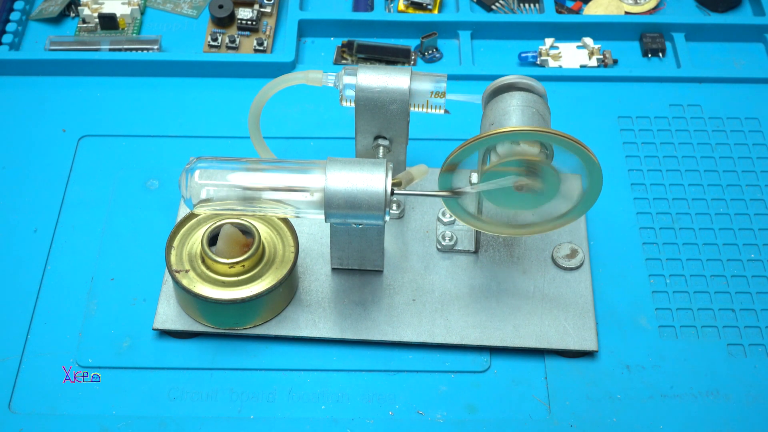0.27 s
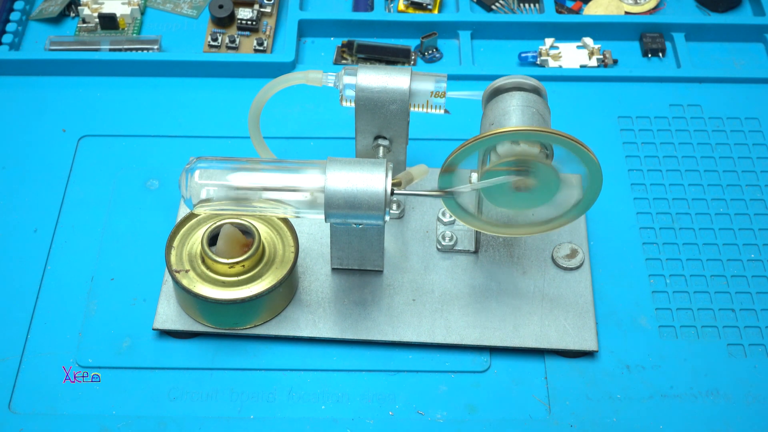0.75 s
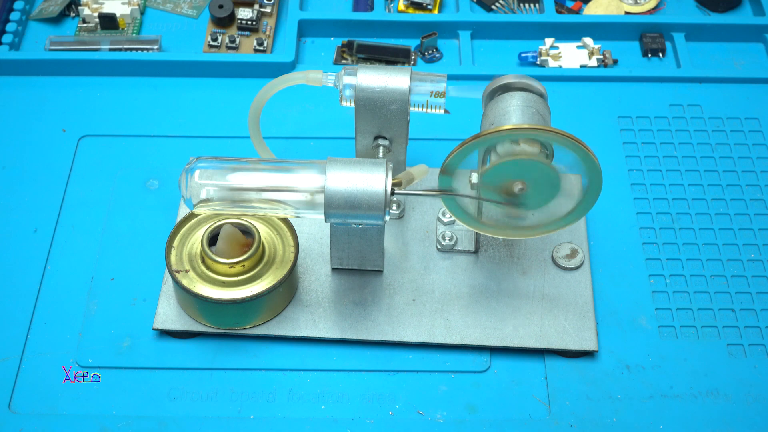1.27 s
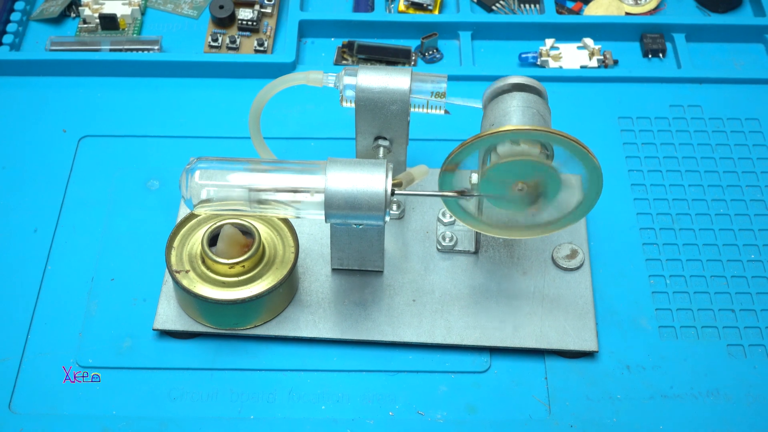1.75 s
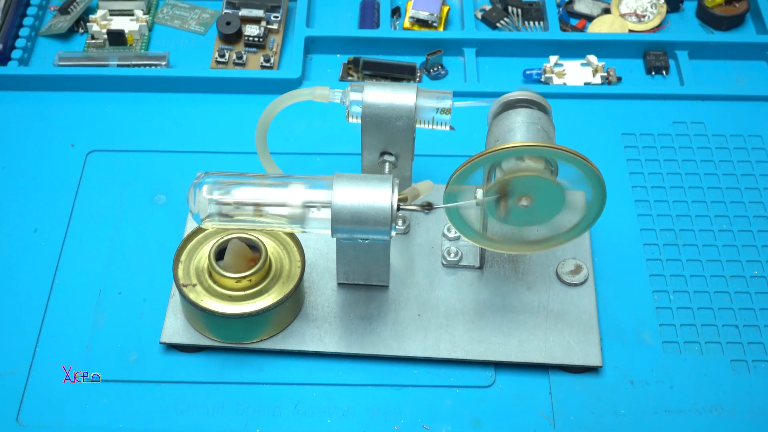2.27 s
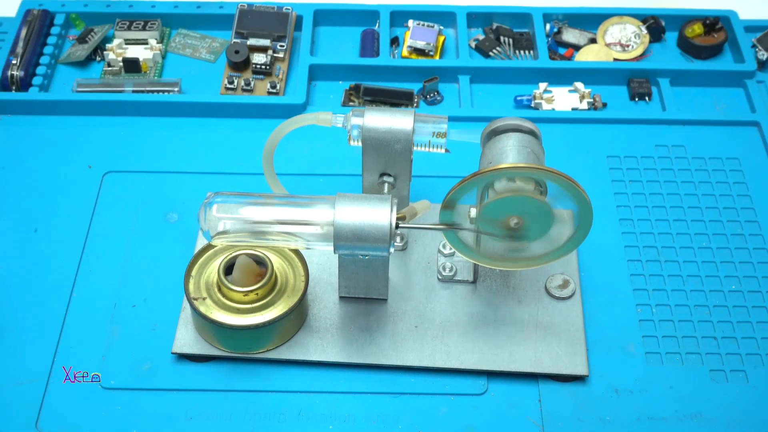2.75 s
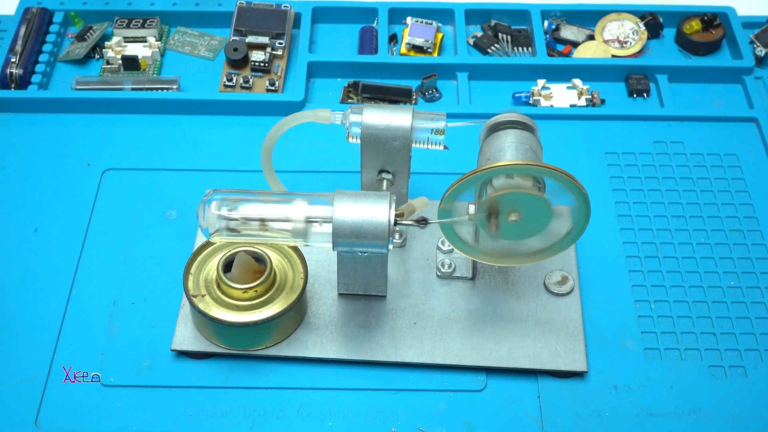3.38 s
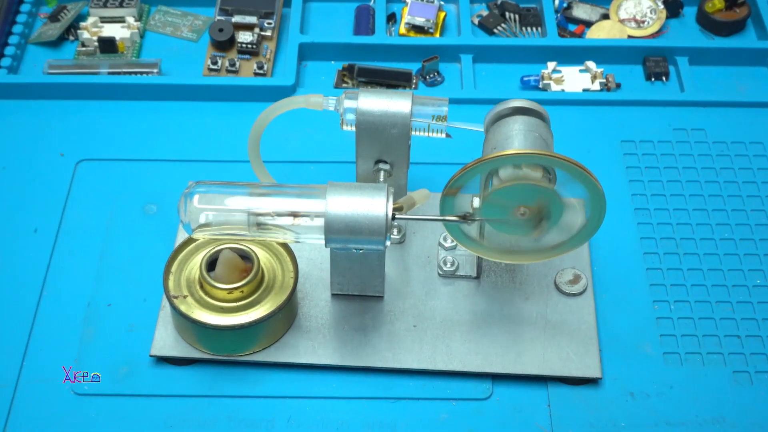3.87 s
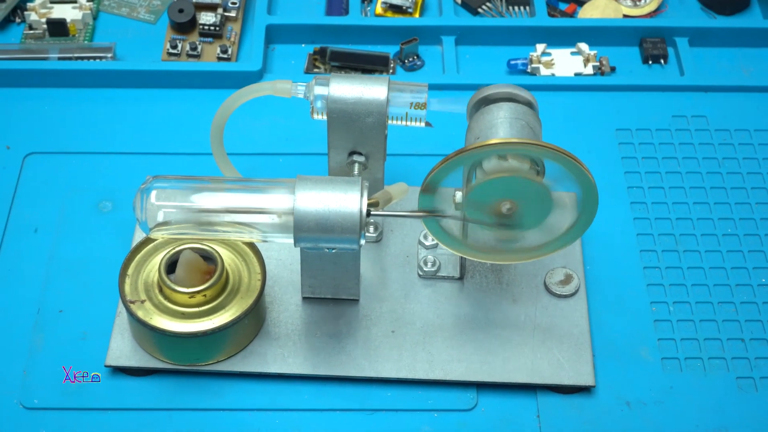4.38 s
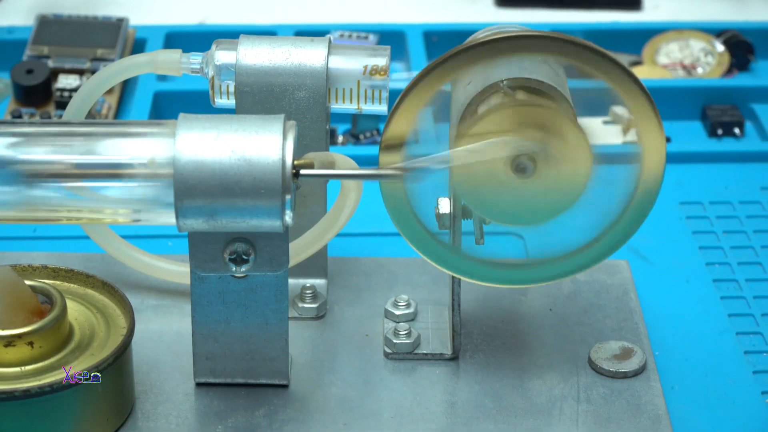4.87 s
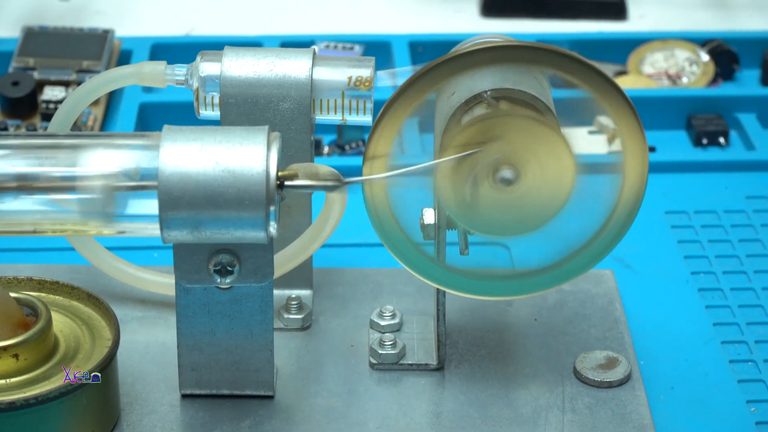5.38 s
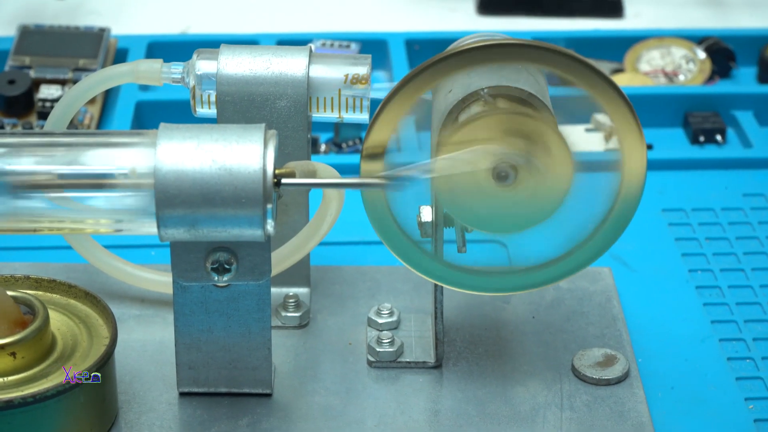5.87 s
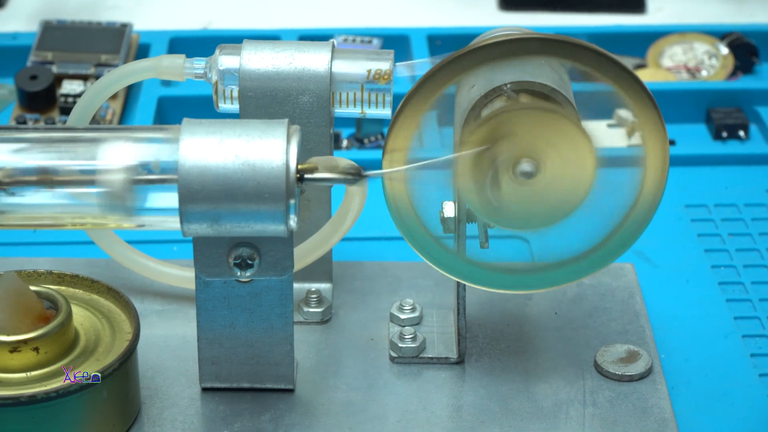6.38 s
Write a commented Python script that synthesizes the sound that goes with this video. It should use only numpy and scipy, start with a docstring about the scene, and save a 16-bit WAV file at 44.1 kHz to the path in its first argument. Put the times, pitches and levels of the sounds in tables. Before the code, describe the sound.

A small hot-air engine rattles fast and evenly on its metal base, with a heavy low microphone bump, then a cut to closer, faster, sharper clatter.

```python
"""A small hot-air engine rattles on its metal base, heard from afar over the hum of a room.
Every flywheel turn its piston, loose rod pin and crank pin knock in their play; each knock is a few fading tones
plus a short crack of noise, and rubbing rods hiss in between. Near 2 s the microphone's stand is bumped and sways,
and it is handled again from about 4 s. At 4.58 s the sound cuts to a closer spot, with the engine running faster."""
import sys
import numpy as np
from scipy import signal
from scipy.fft import rfft, irfft, next_fast_len
from scipy.io import wavfile
from scipy.ndimage import uniform_filter1d, map_coordinates

SR = 44100
rng = np.random.default_rng(int(sys.argv[2]) if len(sys.argv) > 2 else 0)


def log_audio(samples):
    """Write samples as a 16-bit WAV file to the path given in sys.argv[1]."""
    # one column per channel
    frames = np.atleast_2d(samples).T
    # limit to full scale, then quantise
    limited = np.clip(frames, -1, 1)
    pcm = np.round(limited * 32767).astype(np.int16)
    wavfile.write(sys.argv[1], SR, pcm)


def invert_db(level):
    """Linear amplitude ratio for a level in decibels (20 dB per decade), elementwise."""
    return 10 ** (np.asarray(level, dtype=float) / 20)


N = 292383  # length [samples]
CUT_S = 4.5755  # the move from the far spot to the close one
FIRST_FAR_S, FIRST_NEAR_S = -.0103, 4.6063  # first piston knock heard from each spot

# flywheel speed, from afar and then close up: (time [s], speed [turns per s])
SPEED_FAR = [(0, 8.4803), (.8405, 8.4818), (1.8885, 8.8016), (2.0704, 8.6794), (2.4548, 8.9631),
             (2.9107, 8.9264), (3.637, 9.1064), (4.0208, 9.2962), (4.57, 9.3688)]
SPEED_NEAR = [(4.58, 11.8612), (5.1465, 11.8769), (6.1807, 12.1408), (6.63, 11.8157)]
# Ringing tones of each struck part, louder or softer than the blow's own level:
# (pitch [Hz], level from afar [dB], level close up [dB], rise [ms], time to fall 60 dB [ms])
PISTON_TONES = [(1897, -8.5, -12, 3.3, 12.5), (2022, -6, -5, 6.1, 11.7), (3755, 1.5, 0, 0.54, 11.9),
                (4136, -13, -6, 2.2, 18), (4560, -15, -9, 1.25, 24), (5110, -12.5, -6.5, 0.62, 15),
                (5790, -25, -7.5, 1.2, 14.6), (6820, -19.5, -12.5, 1.7, 8.3),
                (9710, -21.5, -15.5, 0.39, 19)]
# the table under the base, rung by the knocks, same columns
TABLE_TONES = [(363.6, -22, -21, 0.48, 91), (490.4, -29.5, -29.5, 0.14, 210), (706, -22, -20.5, 0.26, 49)]
# the rod ticking in its guide, same columns
GUIDE_TONES = [(6330, -8, -26, 0.58, 30), (8940, -58, -6.5, 0.84, 18.4)]
# the loose rod pin, same columns
PIN_TONES = [(3293, -7.5, -11.5, 1.7, 31), (4650, 16, 2.5, 0.36, 1.7), (5940, -6, -11.5, 0.81, 31),
             (6660, -8, -14.5, 0.27, 17), (7890, 0, -12, 0.77, 23), (9860, 1, 1, 0.3, 11.4),
             (10300, -11, -10.5, 2.1, 15), (12120, -12, -15.5, 0.65, 11)]
# the metal base, same columns
BASE_TONES = [(1040, -10, -13, 3.3, 4.85), (1440, -12.5, -49, 0.048, 16.6), (1873, -1.5, 1, 3.3, 12),
              (2122, -11.5, -3.5, 1.8, 18), (2480, -36, -22, 2.2, 44), (3423, -15.5, -3, 0.31, 21.4),
              (3977, -15, -9.5, 1.1, 31)]
# the crank pin, same columns
CRANK_TONES = [(1852, -11, -23, 4.9, 14.8), (2244, -2.5, -0.5, 0.79, 12.5), (2560, -12, -10, 1, 45),
               (2650, -3, -6, 0.3, 20), (5020, -19, -20, 0.17, 14), (6130, -19.5, -19, 0.3, 8),
               (7130, -15, -16, 0.4, 7), (12400, -16, -30, 0.4, 7)]
# the bright tone of the pin's faint brushes, same columns
BRUSH_TONES = [(9760, -2.5, 2, .8, 17.5)]
# the soft thud at the stroke's end, same columns
THUD_TONES = [(1473, -8, -8.5, 1.4, 24), (1856, -5, -0.8, 1.7, 24), (2260, -14, -18, 2.5, 34)]
# a knocked part rebounds in its play: (delay [ms], piston change [dB], crank change [dB])
REBOUNDS = [(0, 0.5, 0.5), (6, -13, -67), (12, -20, -17)]
# loudness of the rubbing rods through a turn: (place [share of a turn], relative level [dB])
RUBBING = [(0, 12.5), (.08, 9), (.2, -2), (.33, 1), (.42, 7), (.62, 6.5), (.78, -7.5), (.88, 6.5),
           (.96, -4.5)]
# tone colour of the rubbing: (pitch [Hz], relative level [dB])
RUBBING_COLOUR = [(500, 0.5), (1200, 1), (1900, 1), (2600, 4.5), (3600, 5), (4600, 0.5), (8500, -6),
                  (9800, -11.5), (11500, -5), (13500, -25), (15500, -23)]
# ticks in the guide: (place from afar [turns], level from afar [dB], place close up [turns], level close up [dB])
TICKS = [(0.25, -49.5, .93, -39), (.72, -58, .74, -32)]
# light taps of the pin:
# (place from afar [turns], level from afar [dB], place close up [turns], level close up [dB], scatter [dB])
TAPS = [(.362, -47, .315, -23.5, 1.5), (.85, -66, .835, -43, 2.5)]
# hard strikes of the loose pin: (time [s], level [dB])
HARD_STRIKES = [(2.128, -34), (4.636, -15.5), (4.6746, -22.5), (4.7224, -9), (4.7615, -22), (4.806, -11.5),
                (4.891, -15.5), (4.971, -14.5), (5.0142, -21.5), (5.057, -13.5), (5.097, -21.5),
                (5.223, -13.5), (5.267, -19), (5.31, -14), (5.3958, -10.5), (5.479, -12.5), (5.5633, -10.5),
                (5.6473, -9.5), (5.685, -19), (5.727, -9.5), (5.812, -12), (5.85, -17), (5.932, -22),
                (6.0161, -21.5), (6.0576, -12), (6.1446, -9), (6.1813, -13.5), (6.224, -13.5),
                (6.3084, -14), (6.3931, -9), (6.4316, -17), (6.4737, -15), (6.5587, -13), (6.5978, -16)]
# small scuffs of the rod around the crank knock: (place [turns], level [dB])
SCUFFS = [(0.427, -38.5), (.5, -36.5), (.63, -32.5)]
# moments when the base's tones ring louder than usual: (time [s], level [dB])
LOUD_MOMENTS = [(.043, -22), (.632, -21), (1.451, -21.5), (2.138, -11), (2.811, -19), (3.036, -18),
                (3.48, -17.5), (3.7, -19), (4.895, -14.5), (5.4, -15), (5.567, -15.5), (5.816, -16.5),
                (6.148, -17), (6.313, -18.5), (6.397, -20.5), (6.562, -15)]
# faint brushes of the pin: (place [turns], level [dB], scatter [dB])
BRUSHES = [(.458, -39, 3), (.73, -44, 4), (.82, -41, 3.5)]
# crank knock and end-of-stroke thud:
# (time [s], crank place [turns], crank level [dB], thud place [turns], thud level [dB])
STROKE = [(0, .545, -17, .9, -35), (4.5, .54, -19, .83, -31), (4.6, .525, -17, .75, -31),
          (6.6, .527, -17, .77, -29)]
# how long the room rings: (pitch [Hz], time to fall 60 dB [s])
ROOM_RINGING = [(300, 0.12), (2000, 0.2), (10000, 0.15)]
# tone colour of the room's hum: (pitch [Hz], relative level [dB])
HUM_COLOUR = [(60, -35), (85, 17), (130, 3), (300, -2), (345, 9), (420, 12.5), (450, 5), (500, 10),
              (530, -16.5), (700, 1), (3000, -9.5), (8000, -38), (15500, -12)]
# handling of the stand: (time [s], sway [dB], rumble [dB])
HANDLING = [(0, -76, -56.5), (1.6, -74, -50), (1.69, -37, -42), (1.9, -24, -39.5), (2.06, -22, -35),
            (2.11, -32, -33), (2.2, -32, -33), (2.3, -38, -50), (2.55, -37.5, -54.5), (3.749, -39, -51.5),
            (4.03, -34, -39), (4.17, -36, -48), (4.32, -28.5, -38), (4.45, -32, -63), (4.7, -44.5, -49),
            (6.63, -47, -49.5)]
# parts of the bumps on the stand, several of which can make one bump:
# (time of peak [s], pitch [Hz], peak level [dB], swell [ms], fade [ms])
BUMP_PARTS = [(1.954, 156, -20, 2, 8), (1.9712, 175, -11.5, 2, 6), (1.984, 125, -18, 6, 10),
              (2.098, 140, -15, 6, 2), (2.1095, 72, -.2, 5, 6.5), (2.14, 88, -19, 15, 50),
              (2.131, 745, -19, 0.83, 2), (4, 92, -28, 2.3, 3.9), (4.534, 100, -20.5, 10.5, 7.3),
              (4.561, 45, -19, 7.2, 4.3)]
# swing of the stand after a hard bump, in two parts that add up:
# (time [s], pitch [Hz], first level [dB], its fade [s], lasting level [dB], its time to fall 60 dB [s])
SWING = (2.106, 23.3, .1, .128, -15, 3)


def along(points, hz):
    """Reads (pitch, value) points at any pitch, on a log pitch axis."""
    f, value = np.transpose(points)
    return np.interp(np.log(hz + 1), np.log(f + 1), value)


def filtered(x, response):
    """Scales each frequency of x by a given response."""
    m = next_fast_len(N + SR // 2)
    return irfft(rfft(x, m) * response(np.fft.rfftfreq(m, 1 / SR)), m)[:N]


def noise(response):
    """Coloured noise with an average (rms) level of 1."""
    x = filtered(rng.standard_normal(N), response)
    return x / x.std()


def scattered(value, spread, count):
    """Spreads a usual value by chance, once for each event."""
    return value + spread * rng.standard_normal(count)


def add(track, s, sound):
    """Mixes a sound in at time s; sounds from before the cut stop there."""
    start = min(round(s * SR), N)
    end = round(CUT_S * SR) if s < CUT_S else N
    sound = sound[max(-start, 0):][:max(end - max(start, 0), 0)]
    track[max(start, 0):][:len(sound)] += sound


def knocks(times, levels_db, tones, spread_db, crack_db, rough, size=3, crack_s=0.0021, habit=0, soft_s=1e-5):
    """Each blow rings the part's tones at slightly new strengths; chatter of loose parts roughens the ring.
    crack_db is (far, close); size [samples] blunts the crack; habit is the share of noise repeated in each blow."""
    track, t = np.zeros(N), np.arange(SR // 30) / SR
    hz, far_db, near_db, rise_ms, fall_ms = np.transpose(tones)[..., None]
    shape = (1 - np.exp(-1000 * t / rise_ms)) ** 2 * invert_db(-60000 * t / fall_ms)
    shape = shape / shape.max(axis=1, keepdims=True)
    usual_chatter = rng.standard_normal((len(tones), 70))
    usual_crack = rng.standard_normal(len(t))

    def varied(usual):
        return np.sqrt(habit) * usual + np.sqrt(1 - habit) * rng.standard_normal(usual.shape)

    # chatter takes a new random value 2000 times a second, with straight lines between
    chatter_at = np.broadcast_arrays(np.arange(len(tones))[:, None], 2000 * t)
    for s, db in zip(times, levels_db):
        near = s > CUT_S
        chance = rng.standard_normal((3, len(tones), 1))
        gain = invert_db((near_db if near else far_db) + spread_db * chance[0])
        chatter = map_coordinates(varied(usual_chatter), chatter_at, order=1)
        tone = np.sin(2 * np.pi * hz * (1 + .004 * chance[1]) * t + .3 * chance[2])
        ring = gain * shape * (1 + rough * chatter) * tone
        crack_shape = invert_db(crack_db[int(near)] - 60 * t / crack_s) * (1 - np.exp(-t / soft_s))
        crack = crack_shape * uniform_filter1d(varied(usual_crack), size=size)
        # small parts give off little bass
        crack = uniform_filter1d(crack, size=2) - uniform_filter1d(crack, size=20)
        add(track, s, invert_db(db) * (ring.sum(axis=0) + crack))
    return track


def turns(first_s, speed, end_s):
    """Start and length of every flywheel turn: where the summed speed passes whole numbers."""
    t = first_s + np.arange(5 * SR) / SR
    done = np.cumsum(np.interp(t, *np.transpose(speed))) / SR
    s = np.interp(np.arange(int(done[-1])), done, t)
    return np.array([s[:-1], np.diff(s)])[:, s[:-1] < end_s]


def piston_knocks(s):
    """The piston knocks in its play as each turn starts, rebounds, and rings the table too."""
    level_db = scattered(-18, np.where(s < CUT_S, .5, 1.3), len(s))
    sound = np.zeros(N)
    for lag_ms, change_db, _ in REBOUNDS:
        sound += knocks(s + lag_ms / 1000, level_db + change_db, PISTON_TONES + TABLE_TONES, spread_db=1.5,
                        crack_db=(2.5, -2), rough=.35, habit=.75, crack_s=.005, soft_s=.0002, size=2)
    return sound


def sliding_rods(s, turn):
    """Rubbing rods hiss; the hiss swells and sinks with the turn and flickers with uneven friction."""
    now = np.arange(N) / SR
    grit = invert_db(3.5 * map_coordinates(rng.standard_normal(N // 90 + 4), [np.arange(N) / 90]))
    last = np.searchsorted(s, now) - 1
    place = (now - s[last]) / turn[last] % 1
    level_db = np.where(now > CUT_S, -43, -50) + np.interp(place, *np.transpose(RUBBING))
    return invert_db(level_db) * grit * noise(lambda hz: invert_db(along(RUBBING_COLOUR, hz)))


def guide_ticks(s, turn):
    """The rod ticks faintly against its guide, twice a turn."""
    far, sound = s < CUT_S, np.zeros(N)
    for far_at, far_db, near_at, near_db in TICKS:
        at = s + scattered(np.where(far, far_at, near_at), .0046, len(s)) * turn
        level_db = scattered(np.where(far, far_db, near_db), 2, len(s))
        sound += knocks(at, level_db, GUIDE_TONES, spread_db=2, crack_db=(-5, -8), rough=.7, size=2)
    return sound


def pin_blows(s, turn):
    """Times and levels of the pin: two taps a turn, each replaced by a hard strike where one falls close by."""
    hard, hard_db = np.transpose(HARD_STRIKES)
    far_at, far_db, near_at, near_db, scatter_db = np.transpose(TAPS)[..., None]
    count = (len(TAPS), len(s))
    at = s + scattered(np.where(s < CUT_S, far_at, near_at), .006, count) * turn
    level_db = scattered(np.where(s < CUT_S, far_db, near_db), scatter_db, count)
    nearest = abs(at[..., None] - hard).argmin(axis=-1)
    struck = abs(at - hard[nearest]) < .009
    return np.where(struck, hard[nearest], at), np.where(struck, hard_db[nearest], level_db)


def pin_knocks(pins, pin_db):
    """The small loose pin rings high and sharp."""
    return knocks(pins.ravel(), pin_db.ravel(), PIN_TONES, spread_db=1.0,
                  crack_db=(1, 5), rough=0.37, size=1, crack_s=0.0028)


def base_jolts(s, jolt, jolt_pin_db):
    """The turn's first pin blow jolts the base and table; close up, harder blows jolt them more."""
    level_db = scattered(np.where(s < CUT_S, -29, -16.5 + .4 * jolt_pin_db), 0.44, len(s))
    return knocks(jolt, level_db, BASE_TONES + TABLE_TONES, spread_db=1.5, crack_db=(-1, -7), rough=0.62)


def rod_scuffs(s, turn):
    """From afar, small scuffs of the rod ring the crank's tones."""
    s, turn = s[s < CUT_S], turn[s < CUT_S]
    sound = np.zeros(N)
    for place, db in SCUFFS:
        at = s + scattered(place, .012, len(s)) * turn
        level_db = scattered(db, 1.9, len(s))
        sound += knocks(at, level_db, CRANK_TONES, spread_db=3, crack_db=(-14, -14), rough=0.45)
    return sound


def base_ringing(s, turn, jolt):
    """The base's tones ring once a turn as the pin's jolt comes back; some moments are set louder."""
    far = s < CUT_S
    at = np.where(far, s + .452 * turn, jolt + .003)
    level_db = scattered(np.where(far, -23.5, -25.5), 0.5, len(s))
    for loud_s, loud_db in LOUD_MOMENTS:
        level_db[abs(at - loud_s).argmin()] = loud_db
    return knocks(at, level_db, BASE_TONES, spread_db=1.5, crack_db=(-25, -25), rough=0.3)


def pin_brushes(s, turn):
    """From afar, faint brushes of the pin ring only one bright tone."""
    s, turn = s[s < CUT_S], turn[s < CUT_S]
    sound = np.zeros(N)
    for place, db, scatter_db in BRUSHES:
        at = s + scattered(place, .0056, len(s)) * turn
        level_db = scattered(db, scatter_db, len(s))
        sound += knocks(at, level_db, BRUSH_TONES, spread_db=1.5, crack_db=(-16, -16), rough=0.4, size=1)
    return sound


def crank_knocks(s, turn, place, db):
    """The crank pin knocks in its play about half a turn later, rebounds, and rings the table too."""
    level_db = scattered(db, 0.5, len(s))
    sound = np.zeros(N)
    for lag_ms, _, change_db in REBOUNDS:
        sound += knocks(s + place * turn + lag_ms / 1000, level_db + change_db, CRANK_TONES + TABLE_TONES,
                        spread_db=1, crack_db=(-4, -14), rough=.3, size=1, habit=.7, crack_s=.005, soft_s=.0003)
    return sound


def end_thuds(s, turn, place, db):
    """A soft, rough thud ends the stroke and rattles once more, more weakly."""
    thud = s + scattered(place, .01, len(s)) * turn
    level_db = scattered(db, 2, len(s))
    sound = np.zeros(N)
    for later, loss_db in ((0, 0), (.06, np.where(s < CUT_S, 9, 2))):  # (turns, dB)
        sound += knocks(thud + later * turn, level_db - loss_db, THUD_TONES, spread_db=2.5,
                        crack_db=(-14, -14), rough=1.0)
    return sound


def engine():
    """All the contacts of every turn, and the rods sliding between them."""
    far_turns = turns(FIRST_FAR_S, SPEED_FAR, CUT_S)
    near_turns = turns(FIRST_NEAR_S, SPEED_NEAR, N / SR)
    s, turn = np.hstack([far_turns, near_turns])
    pins, pin_db = pin_blows(s, turn)
    jolt = pins[0]
    at, *stroke = np.transpose(STROKE)
    crank_at, crank_db, thud_at, thud_db = (np.interp(s, at, column) for column in stroke)
    sound = piston_knocks(s) + sliding_rods(s, turn) + guide_ticks(s, turn)
    sound += pin_knocks(pins, pin_db) + base_jolts(s, jolt, pin_db[0])
    sound += rod_scuffs(s, turn) + base_ringing(s, turn, jolt) + pin_brushes(s, turn)
    return sound + crank_knocks(s, turn, crank_at, crank_db) + end_thuds(s, turn, thud_at, thud_db)


def room(x):
    """The room answers with a noise tail in which each frequency dies at its own speed."""
    hz, t, z = signal.stft(rng.standard_normal(SR // 3), SR, nperseg=256)
    fading = z * invert_db(-60 * t / along(ROOM_RINGING, hz)[:, None])
    tail = signal.istft(fading, SR, nperseg=256)[1]
    late = np.pad(x, (200, 0))  # the answer comes 200 samples late
    return signal.fftconvolve(late, tail / np.linalg.norm(tail))[:N]


def room_hum():
    """The room's own steady hum is coloured noise, a little louder at the close spot."""
    near = np.arange(N) / SR > CUT_S
    return invert_db(np.where(near, -44, -48)) * noise(lambda hz: invert_db(along(HUM_COLOUR, hz)))


def stand_handling():
    """Handling shakes the stand at its low sway and reaches the microphone as rumble."""
    s, sway_db, rumble_db = np.transpose(HANDLING)
    now = np.arange(N) / SR
    # the sway is strongest around 24 Hz
    sway = noise(lambda f: f ** 2 / (1 + ((f - 24) / 9) ** 2) / (f ** 2 + 100) / (1 + (f / 60) ** 4))
    rumble = noise(lambda f: (f > 55) / (1 + (f / 110) ** 4))
    return invert_db(np.interp(now, s, sway_db)) * sway + invert_db(np.interp(now, s, rumble_db)) * rumble


def stand_bumps():
    """Each part of a bump is a short tone that swells and fades around its peak."""
    now, track = np.arange(N) / SR, np.zeros(N)
    for at, hz, peak_db, swell_ms, fade_ms in BUMP_PARTS:
        ms = 1000 * (now - at)
        shape = np.exp(-(ms / np.where(ms < 0, swell_ms, fade_ms)) ** 2)
        track += invert_db(peak_db) * shape * np.cos(2 * np.pi * hz * (now - at))
    return track


def stand_swing():
    """A hard bump sets the stand swinging at one low pitch: a big first swing and a weaker lasting one."""
    start, hz, first_db, fade_s, lasting_db, fall_s = SWING
    track, t = np.zeros(N), np.arange(SR // 2) / SR
    first = invert_db(first_db) * np.exp(-(t / fade_s) ** 2)
    # the lasting part is also faded to nothing between 0.25 and 0.47 s
    lasting = invert_db(lasting_db - 60 * t / fall_s) * np.clip((.47 - t) / .22, 0, 1)
    onset = np.minimum(t / .016, 1)
    add(track, start, -(first + lasting) * onset * np.sin(2 * np.pi * hz * t))
    return track


def scene():
    """The engine, its echo in the room, the room's own hum and the stand."""
    rattle = engine()
    stand = stand_handling() + stand_bumps() + stand_swing()
    return (rattle + invert_db(-15.5) * room(rattle) + room_hum() + stand)[None]


def low_pass(x):
    """Removes everything above the highest recorded frequency."""
    return signal.sosfilt(signal.butter(12, 16490, fs=SR, output="sos"), x)


def record(dry):
    """The level dips briefly at the cut, the microphone loses the top treble, and the biggest swing clips."""
    dip = 1 - .9 * np.exp(-((np.arange(N) / SR - CUT_S - .001) / .002) ** 2)
    # a gentle fall around 14500 Hz, then a steep limit at 15750 Hz
    heard = filtered(dip * dry[0], lambda hz: 1 / (1 + (hz / 14500) ** 6) / (1 + (hz / 15750) ** 80))
    mix = np.clip(heard, -1, 1)[None]
    return low_pass(mix)


dry = scene()
out = record(dry)
log_audio(out)
```